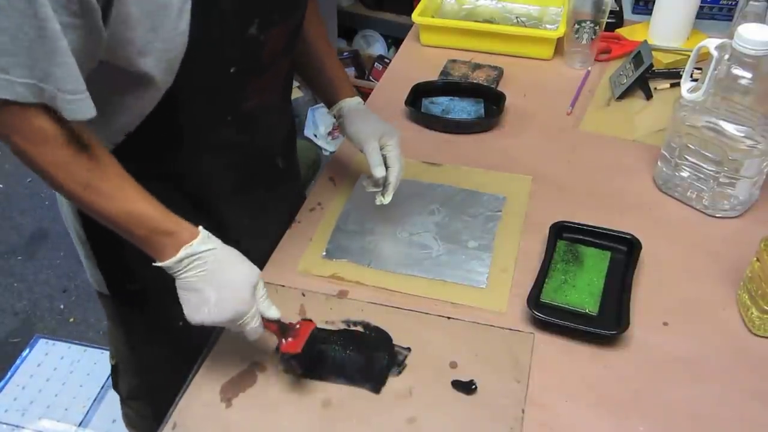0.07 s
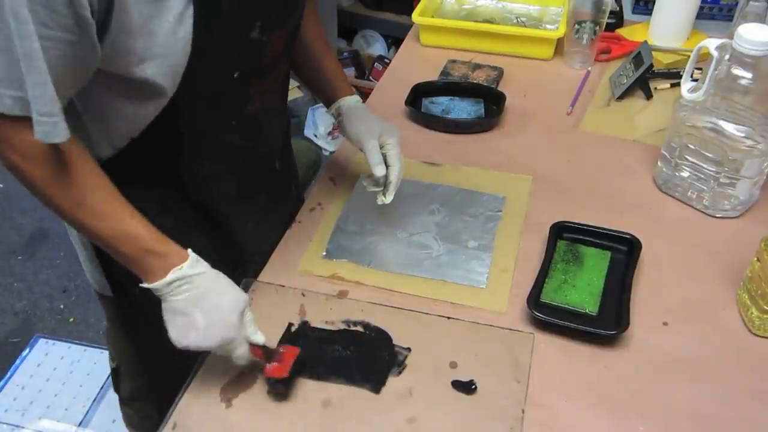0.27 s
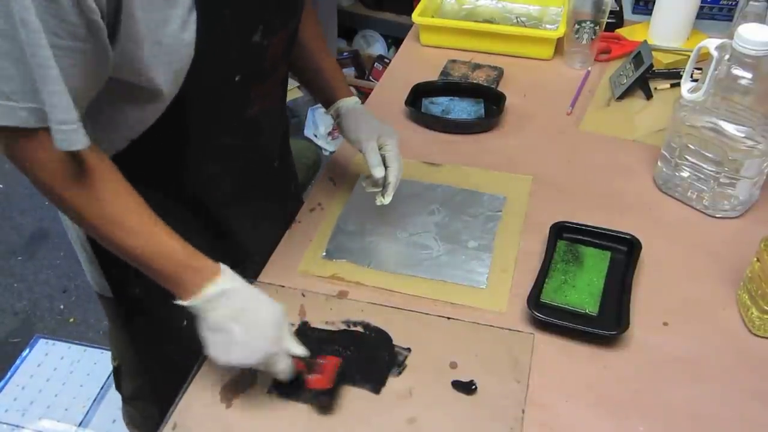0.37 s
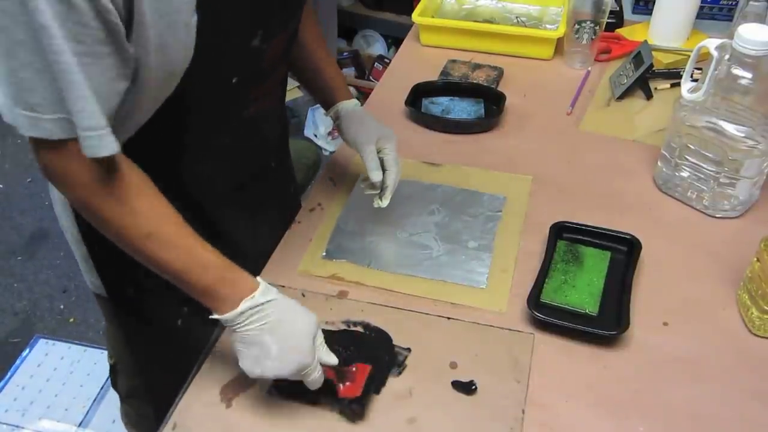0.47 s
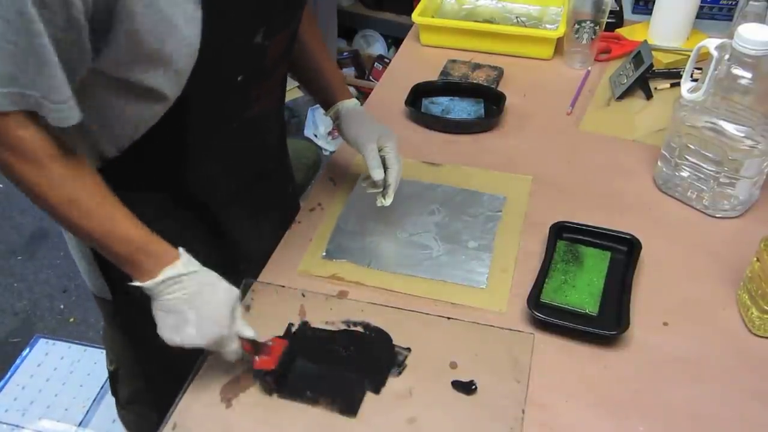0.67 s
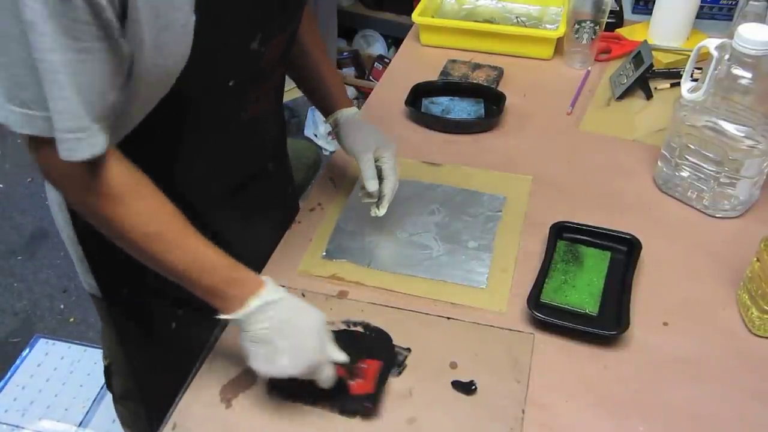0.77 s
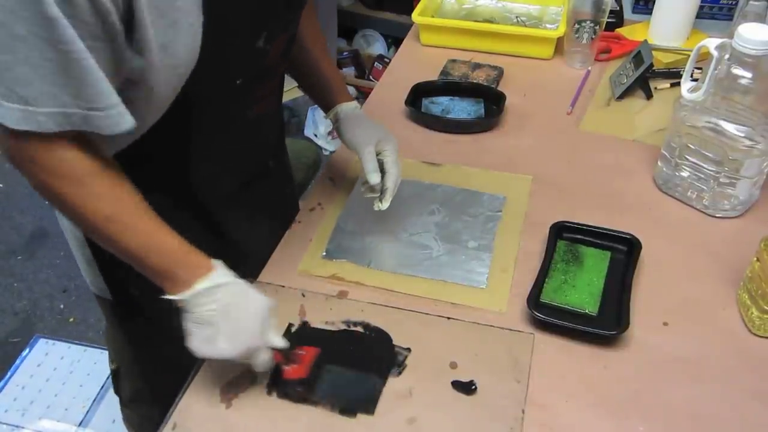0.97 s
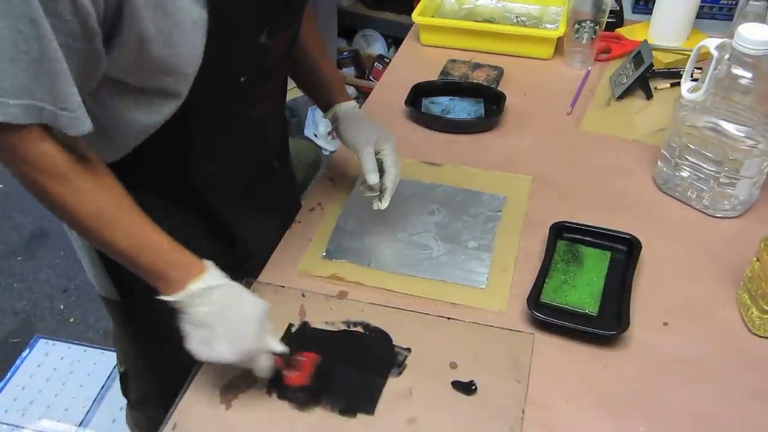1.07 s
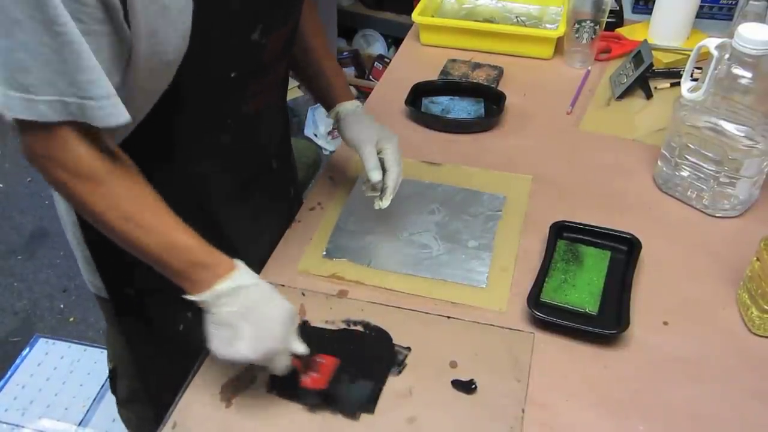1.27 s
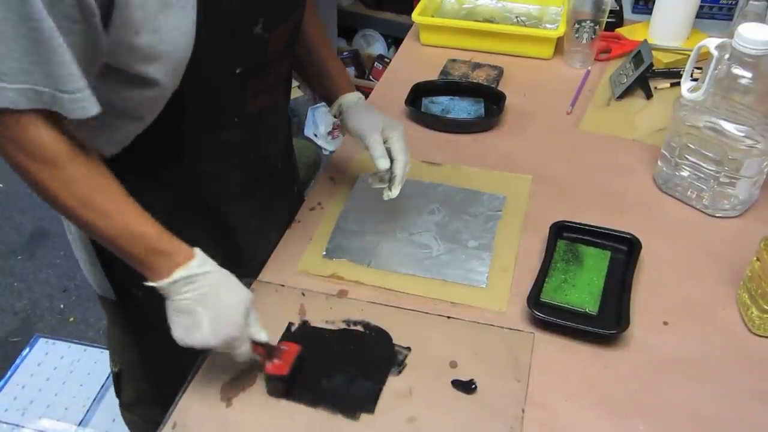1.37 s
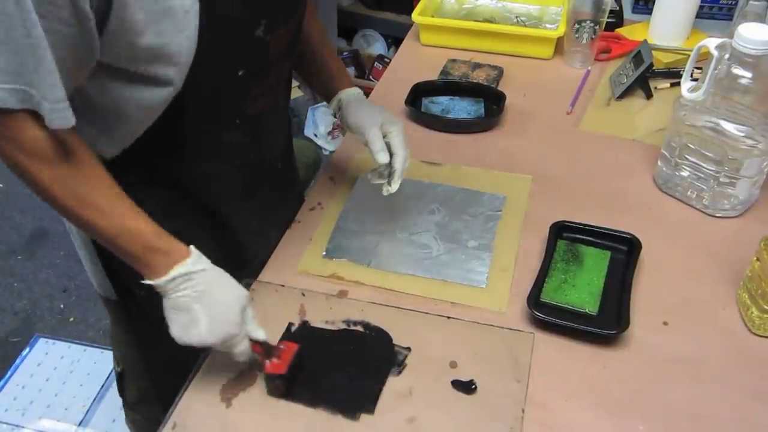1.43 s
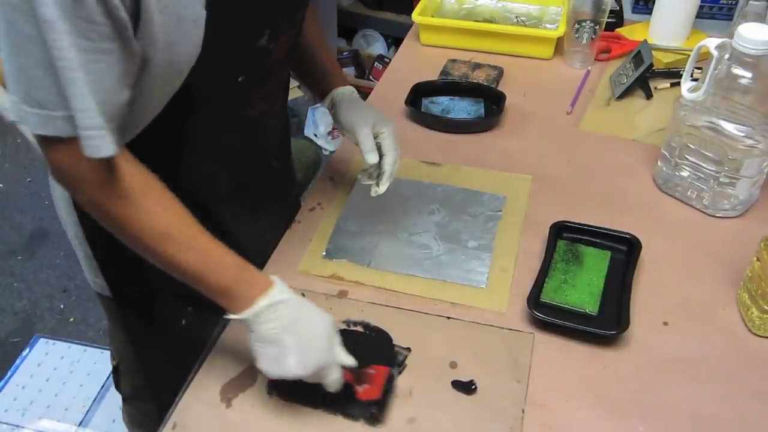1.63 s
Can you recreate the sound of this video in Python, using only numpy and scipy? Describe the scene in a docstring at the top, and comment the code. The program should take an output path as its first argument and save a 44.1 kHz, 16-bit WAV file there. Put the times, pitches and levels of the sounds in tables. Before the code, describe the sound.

Close up in a small quiet room, a hand roller spreads tacky ink in short rumbling, crackly strokes on a tabletop slab, its frame ticking and rattling, with one bright knock early and a duller one late.

```python
"""A quiet small room with a faint high whine; almost at once a metal frame ticks close to the microphone.
Then a rubber roller runs back and forth through tacky ink on a slab lying on a work table. Random bumps
rumble through the slab's modes, snapping ink threads make a fine patchy hiss, rough rubs clack the loose
axle and narrow-band noise squeaks faintly. Twice the roller knocks hard: a push rings the slab, with a crack."""
import sys
import numpy as np
from scipy import signal
from scipy.fft import rfft, irfft
from scipy.io import wavfile
from scipy.ndimage import uniform_filter1d

SR = 44100
rng = np.random.default_rng(int(sys.argv[2]) if len(sys.argv) > 2 else 0)


def log_audio(samples):
    """Write samples as a 16-bit WAV file to the path given in sys.argv[1]."""
    # one column per channel
    frames = np.atleast_2d(samples).T
    # limit to full scale, then quantise
    limited = np.clip(frames, -1, 1)
    pcm = np.round(limited * 32767).astype(np.int16)
    wavfile.write(sys.argv[1], SR, pcm)


N = 74970  # length in samples

# Modes of the slab on its table. Each row: frequency in Hz, time to fall 60 dB in seconds, then the
# relative level in dB when knocked at the edge, knocked on the face, and rolled over.
SLAB_MODES = [(323.7, 0.12, -10.5, -14, -2), (366, 0.12, -16.5, -13.5, -6.5), (436, 0.075, -18, -8, -10.5),
              (515, 0.097, -21, -11, -40), (663.5, 0.12, -23, -15, -22), (840.7, 0.12, -20, -23, -3.5),
              (913.4, 0.042, -4.5, -5.5, -9.5), (1008.7, 0.11, -18.5, -11.5, -14.5),
              (1124.3, 0.055, -11, -9, -11.5), (1170, 0.012, 9.5, 10, -13.5), (1233, 0.029, -4, -12, -8),
              (1529, 0.066, -5.5, -2, -14.5), (1620, 0.11, -11.5, -11.5, -20),
              (1644, 0.11, -3.5, -40, -29.5), (2108, 0.04, -9, -10, -28), (2428, 0.018, 5, -1.5, -20.5),
              (3790, 0.009, -0.5, -40, -21)]
# Knocks of the roller on the slab. Each row: start in seconds, level in dB, contact time in ms,
# share of the face in the blow (0 edge, 1 face), level of the crack in dB.
KNOCK_EVENTS = [(.037, -35.5, 1.05, 0.88, -65), (.2433, -10, 0.13, 0.03, -8.5),
                (0.883, -46, 0.72, 0.4, -70), (1.323, -24.5, 1.43, 0, -70), (1.397, -23, 1.2, 0.07, -70),
                (1.4112, -12.5, 0.43, 0.99, -24)]


def gain_of(db):
    """Turns a level in dB into an amplitude factor."""
    return 10 ** (np.asarray(db) / 20)


def evened(x):
    """Scales a signal to an RMS of one."""
    return x / np.sqrt(np.mean(x ** 2) + 1e-20)


def read(points, hz):
    """Reads a curve of (Hz, value) points, interpolated along log frequency."""
    point_hz, value = np.transpose(points)
    return np.interp(np.log(hz + 1), np.log(point_hz + 1), value)


def add(mix, start_s, sound):
    """Lays a sound into the mix at its start time, cut off at the end of the mix."""
    part = mix[round(start_s * SR):][:len(sound)]
    part += sound[:len(part)]


def colour(x, spectrum):
    """Filters x by a spectrum, silent from 100 Hz beyond its top point, and evens the result."""
    hz = np.fft.rfftfreq(len(x), 1 / SR)
    in_band = hz < spectrum[-1][0] + 100
    return evened(irfft(rfft(x) * gain_of(read(spectrum, hz)) * in_band, len(x)))


def ring(hz, db, t60, size=12000):
    """A sum of dying sines, the modes of a struck body; none falls 60 dB in less than 3 ms."""
    t = np.arange(size)[:, None] / SR
    decay = gain_of(db - 60 * t / np.maximum(t60, .003))
    return (decay * np.sin(2 * np.pi * hz * t)).sum(1)


def grit(per_s, spread_db):
    """Random clicks of either sign, a few of them large."""
    hit = rng.random(N) < per_s / SR
    size = rng.exponential(1, N)
    sign = rng.choice([-1., 1.], N)
    return hit * sign * gain_of(spread_db * np.minimum(size, 5))


def snapping_threads():
    """Dense random clicks, one for each snapping thread of ink."""
    return grit(per_s=9000, spread_db=3)


def fuzzy_tone(centre_hz, width_hz):
    """Noise in one narrow resonance."""
    hz = np.fft.rfftfreq(N, 1 / SR)
    resonance = 1 / (1 + (2 * (hz - centre_hz) / width_hz) ** 2)
    return evened(irfft(rfft(rng.standard_normal(N)) * resonance, N))


def stroke_gain(level_column, power):
    """Each stroke swells and fades as one skewed arch from rest to rest."""
    # Each row: start in seconds, length in seconds, rumble level in dB, share of the stroke at top
    # pressure, hiss level in dB, share of the stroke at top speed.
    strokes = [(0.304, 0.17, -50.5, .65, -59, 0.62), (0.507, 0.15, -43.5, 0.5, -52, 0.61),
               (0.681, 0.15, -37, 0.64, -49, 0.63), (0.873, 0.17, -44, 0.49, -52, 0.55),
               (1.065, 0.14, -40.5, 0.62, -51.5, 0.59), (1.226, 0.13, -44.5, 0.59, -51.5, 0.64),
               (1.455, 0.23, -42, 0.67, -51, 0.68)]
    t, gain = np.arange(N) / SR, np.zeros(N)
    for row in strokes:
        start_s, length_s = row[:2]
        progress = np.clip((t - start_s) / length_s, 0, 1)
        top = np.clip(row[level_column + 1], .2, .85)
        skewed = progress ** (np.log(.5) / np.log(top))  # one half where the arch peaks
        arch = np.abs(np.sin(np.pi * skewed)) ** power
        gain += gain_of(row[level_column]) * arch * (progress < 1)
    return gain


def air():
    """Room noise and a thin fuzzy whine."""
    # Spectrum of the room noise. Each row: frequency in Hz, relative level in dB per Hz.
    air_spectrum = [(15, -48), (25, -6.5), (94, -5.5), (161, 1), (216, -11), (413, -8), (485, -8.5),
                    (951, -15.5), (6110, -23.5), (7790, -25.5), (15700, -32)]
    air_db, whine_db = -55.5, -72  # RMS levels
    noise = gain_of(air_db) * colour(rng.standard_normal(N), air_spectrum)
    return noise + gain_of(whine_db) * fuzzy_tone(centre_hz=7870, width_hz=110)


def room(x):
    """Sparse reflections of random sign, each band with its own strength and dying at its own speed."""
    # Each row: frequency in Hz, time to fall 60 dB in seconds, relative strength in dB.
    room_bands = np.array([(200, 0.73, -24), (1020, 0.12, 0), (2500, 0.12, -4), (5130, 0.1, 2),
                           (12100, 0.094, 0.5)])
    taps = np.zeros(SR // 2)
    at = np.arange(140, len(taps) - 20, 20)  # one reflection in every 20 samples
    taps[at + rng.integers(0, 20, len(at))] = rng.choice([-1., 1.], len(at))
    hz, t, bands = signal.stft(taps, SR, nperseg=256)
    t60 = read(room_bands[:, [0, 1]], hz)[:, None]
    db = read(room_bands[:, [0, 2]], hz)[:, None]
    tail = signal.istft(bands * gain_of(db - 60 * t / t60), SR, nperseg=256)[1]
    return signal.fftconvolve(x, tail / np.linalg.norm(tail))[:N]


def thumps():
    """The whole table jolts under each knock, as one low dying sine."""
    thump_hz, thump_db, thump_t60 = 47.4, -37, .14  # Hz, dB against the knock, seconds
    out = np.zeros(N)
    for start_s, db, *_ in KNOCK_EVENTS:
        add(out, start_s, ring(thump_hz, thump_db + db, thump_t60))
    return out


def squeak():
    """A faint high squeak around one turn of the roller, noise in a narrow band."""
    start_s, length_s, squeak_db = .42, .15, -66.5
    progress = np.clip((np.arange(N) / SR - start_s) / length_s, 0, 1)
    swell = np.sqrt(abs(np.sin(np.pi * progress))) * (progress < 1)
    return gain_of(squeak_db) * swell * fuzzy_tone(centre_hz=4460, width_hz=230)


def frame_ticks():
    """The metal frame ticks; each tick strikes its short modes a little differently in pitch and level."""
    # Each row: frequency in Hz, relative level in dB, time to fall 60 dB in seconds,
    # group (0 low, 1 middle, 2 high, 3 top).
    frame_modes = [(3522, 2, 0.0074, 0), (3756, -9, 0.0087, 0), (4530, -8.5, 0.0063, 0),
                   (5830, 6, 0.0048, 1), (6800, 7.5, 0.0028, 1), (8870, -2, 0.0075, 2),
                   (10100, -1.5, .005, 2), (12700, 10, 0.005, 3), (13900, -3, 0.006, 3)]
    # Each row: start in seconds, then the drive in dB of the low, middle, high and top modes.
    tick_events = [(.0360, -23, -32, -26.5, -35.5), (0.041, -44, -61, -60, -53),
                   (.0472, -29.5, -38, -46, -46), (.1852, -44, -53, -44, -58),
                   (0.1937, -37.5, -39, -45, -66), (0.1985, -39, -60, -69, -70),
                   (.3885, -58, -54, -39.5, -55), (0.4046, -53, -62, -62, -60),
                   (0.5652, -43, -39, -61, -56), (.5935, -42, -53, -50, -40.5),
                   (0.7556, -58, -50, -35, -53), (.7720, -39, -45, -58, -59), (0.7983, -38, -39, -54, -62),
                   (0.9583, -36, -42, -61, -57), (0.9925, -40, -71, -57, -45), (1.1437, -34, -43, -60, -61),
                   (1.3093, -59, -47, -45, -43), (1.3152, -34, -50, -48, -52), (1.3233, -30, -28, -46, -22),
                   (1.3322, -40, -48, -57, -56), (1.3380, -39, -35, -60, -54), (1.3422, -34, -50, -62, -60),
                   (1.3455, -27, -51, -62, -58), (1.3815, -36, -60, -62, -62),
                   (1.4017, -18.5, -23.5, -20, -31.5), (1.4060, -30, -44, -29, -46),
                   (1.4124, -14, -31.5, -29, -35), (1.4742, -53, -50, -46, -51),
                   (1.5980, -37.5, -52, -62.5, -64), (1.6317, -47, -48, -54, -53)]
    rise_s, pitch_spread, level_spread_db = 0.00069, 0.028, 2.8
    out, t = np.zeros(N), np.arange(4000) / SR
    rise = np.sin(np.pi / 2 * np.minimum(t / rise_s, 1)) ** 2
    hz, db, t60, group = np.transpose(frame_modes)
    group = np.round(group).astype(int)
    for start_s, *group_db in tick_events:
        vary_pitch, vary_level = rng.standard_normal((2, len(hz)))
        mode_db = db + np.array(group_db)[group] + level_spread_db * vary_level
        add(out, start_s, rise * ring(hz * (1 + pitch_spread * vary_pitch), mode_db, t60, size=4000))
    return out


def axle_clacks():
    """The loose axle clacks: a short rough rub, random each time, drives its modes."""
    # Each row: frequency in Hz, relative level in dB, time to fall 60 dB in seconds.
    axle_modes = [(1665, 0, 0.037), (2152, 3.5, 0.037), (2215, -0.5, 0.08), (2497, 2, 0.051),
                  (2754, -7.5, 0.059), (2880, 3, 0.031), (3980, -16, 0.028), (4640, -26, .02)]
    # Each row: start in seconds, peak level in dB at the axle.
    clack_events = [(0.352, -43.5), (0.4137, -41.5), (0.58, -35), (0.6177, -42), (0.622, -31.5),
                    (0.6796, -32.5), (0.9192, -40), (1.0095, -33.5), (1.0683, -37.5), (1.075, -28),
                    (1.266, -54), (1.2829, -38), (1.5139, -32.5)]
    rub_t60 = .012  # seconds
    out, t = np.zeros(N), np.arange(600) / SR
    hz, db, t60 = np.transpose(axle_modes)
    body = ring(hz, db, t60, size=4000)
    for start_s, peak_db in clack_events:
        rub = rng.standard_normal(len(t)) * gain_of(-60 * t / rub_t60)
        clack = np.convolve(body, rub)
        add(out, start_s, gain_of(peak_db) * clack / abs(clack).max())
    return out


def knocks():
    """A half-sine push rings the slab, duller the longer the contact; a burst of noise adds a crack."""
    # Spectrum of the crack. Each row: frequency in Hz, relative level in dB per Hz.
    crack_spectrum = [(1200, -39), (2200, -9.5), (3700, -1), (4500, -13.5), (6000, -10), (8500, -15),
                      (11000, -19), (14000, -8), (17000, -28)]
    ring_rise_s, crack_rise_s, crack_t60 = 0.00052, .0008, 0.011  # seconds
    hz, t60, edge_db, face_db, _ = np.transpose(SLAB_MODES)
    out, t = np.zeros(N), np.arange(12000) / SR
    for start_s, db, contact_ms, face, crack_db in KNOCK_EVENTS:
        push = np.sin(np.pi * np.minimum(t[:200] * 1000 / contact_ms, 1))
        mode_db = edge_db + face * (face_db - edge_db)
        body = ring(hz, mode_db, t60) * (1 - np.exp(-t / ring_rise_s))
        add(out, start_s, gain_of(db) * np.convolve(body, push / push.sum()))
        crack = colour(rng.standard_normal(len(t)), crack_spectrum) * np.minimum(t / crack_rise_s, 1)
        add(out, start_s, crack * gain_of(crack_db - 60 * t / crack_t60))
    return out


def skid():
    """Once the roller skids: a burst of snapping threads that starts fast and dies away."""
    # Spectrum of the skid. Each row: frequency in Hz, relative level in dB per Hz.
    skid_spectrum = [(880, -5.5), (1500, -15), (2220, 0), (3040, -7), (3560, -2), (7150, -10.5),
                     (9610, -10.5), (15700, -34)]
    start_s, skid_db, rise_s, skid_t60 = 1.077, -34, 0.0019, 0.14
    t = np.maximum(np.arange(N) / SR - start_s, 0)
    burst = np.minimum(t / rise_s, 1) * gain_of(skid_db - 60 * t / skid_t60)
    return colour(snapping_threads(), skid_spectrum) * burst


def ink():
    """Threads of ink snap behind the roller, unevenly as the film is thick or thin."""
    # Spectrum of the tearing film. Each row: frequency in Hz, relative level in dB per Hz.
    ink_spectrum = [(1060, -44), (1800, -3), (2080, 5.5), (2590, -4), (3580, -4), (5010, -11),
                    (10300, -0.5), (13000, -3), (15700, -12)]
    patch_db = 2.5  # RMS unevenness over time and frequency
    _, _, bands = signal.stft(colour(snapping_threads(), ink_spectrum), nperseg=256)
    patches = uniform_filter1d(rng.standard_normal(bands.shape), size=12, axis=0)  # across frequency
    patches = uniform_filter1d(patches, size=6, axis=1)  # across time
    patchy = bands * gain_of(patch_db * evened(patches))
    film = evened(signal.istft(patchy, nperseg=256)[1][:N])
    return film * stroke_gain(level_column=4, power=0.53)


def rumble():
    """Small bumps under the roller ring the slab, harder as each stroke presses down."""
    hz, t60, _, _, rolled_db = np.transpose(SLAB_MODES)
    bumps = evened(grit(per_s=1100, spread_db=3.5))
    body = ring(hz, rolled_db - 10 * np.log10(t60), t60)  # slow modes start lower: they build up longer
    pressed = bumps * stroke_gain(level_column=2, power=1.76)
    return signal.oaconvolve(pressed, body / np.linalg.norm(body))[:N]


def scene():
    """All sources at the slab, which radiates little bass; their reflections, table thumps and room noise."""
    radiates_hz, room_db = 259, -10
    near = rumble() + ink() + skid() + squeak() + knocks() + frame_ticks() + axle_clacks()
    bass_cut = signal.butter(4, radiates_hz, "high", fs=SR, output="sos")
    near = signal.sosfilt(bass_cut, near)
    return (near + gain_of(room_db) * room(near) + thumps() + air())[None]


def record(dry):
    """The input stage rounds off the hardest peaks; then the band limit."""
    overload, edge_hz = 0.87, 17000  # ceiling as a share of full scale; top of the band in Hz
    soft = overload * np.tanh(dry / overload)
    band_limit = signal.firwin(511, edge_hz, window=("kaiser", 9), fs=SR)
    return signal.oaconvolve(soft, band_limit[None], "same")


dry = scene()
out = record(dry)
log_audio(out)
```